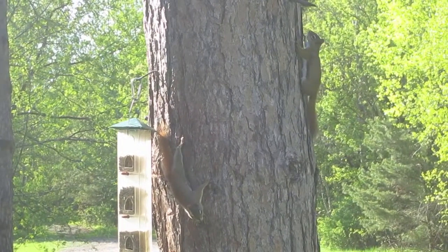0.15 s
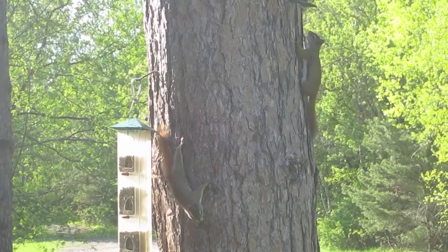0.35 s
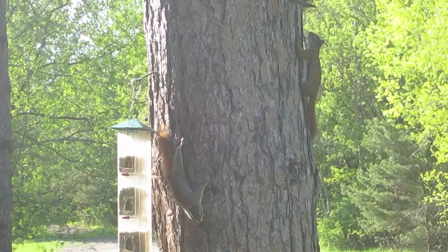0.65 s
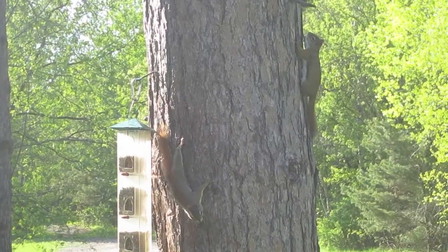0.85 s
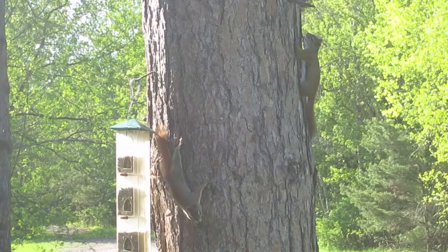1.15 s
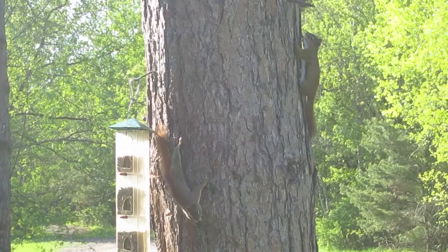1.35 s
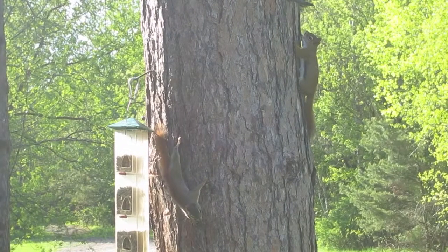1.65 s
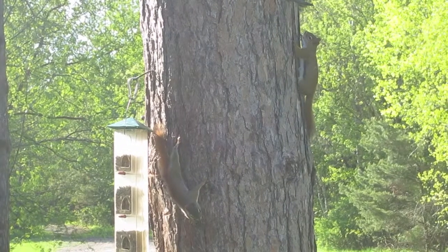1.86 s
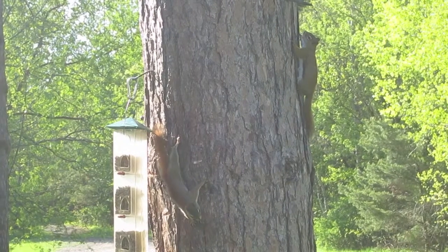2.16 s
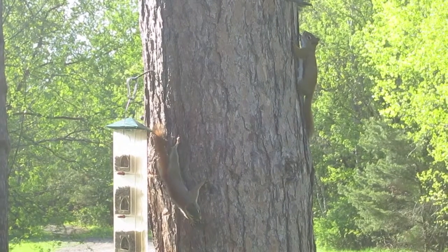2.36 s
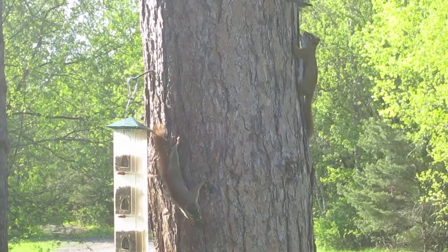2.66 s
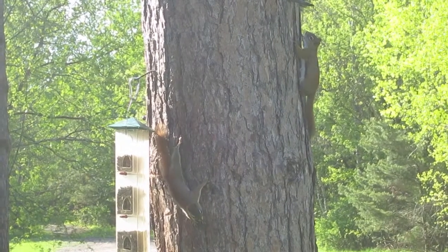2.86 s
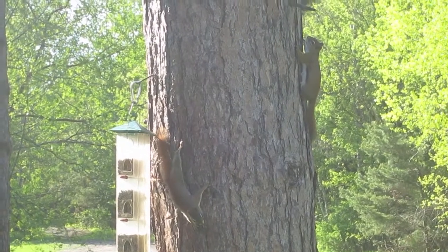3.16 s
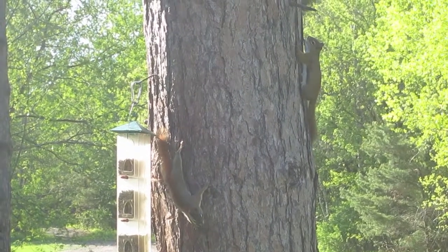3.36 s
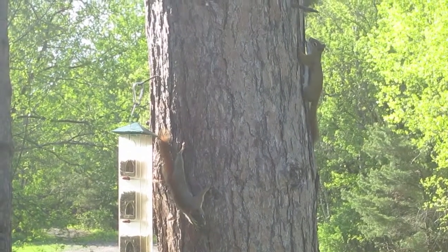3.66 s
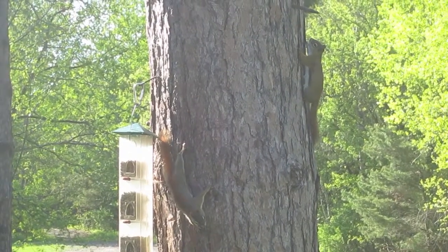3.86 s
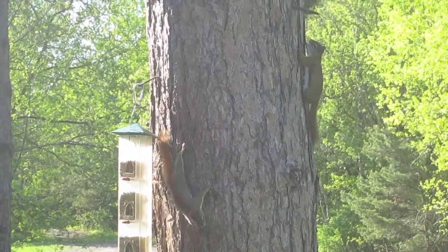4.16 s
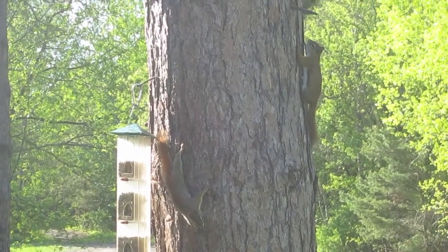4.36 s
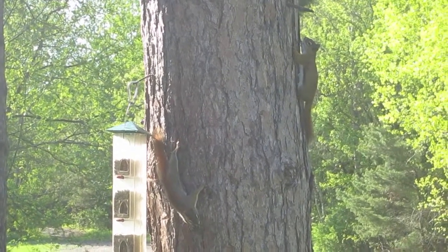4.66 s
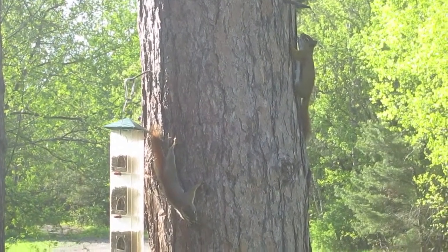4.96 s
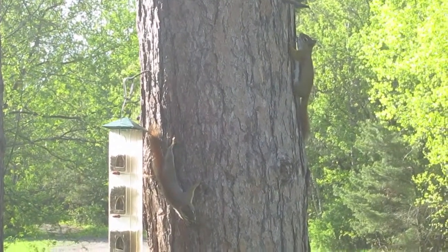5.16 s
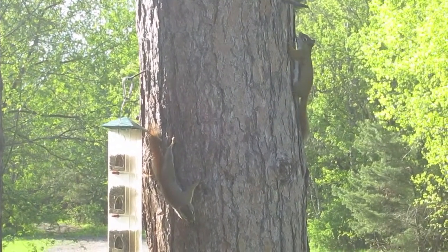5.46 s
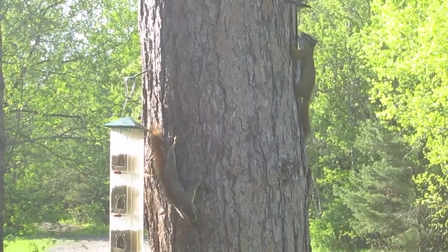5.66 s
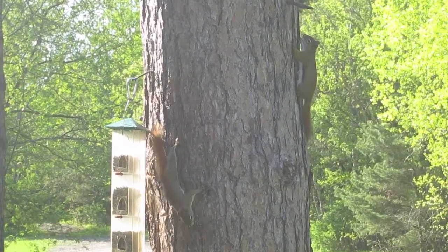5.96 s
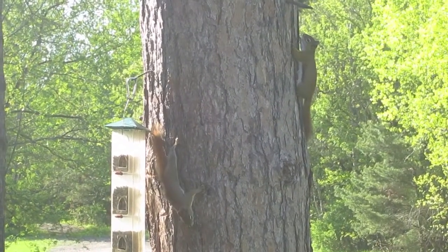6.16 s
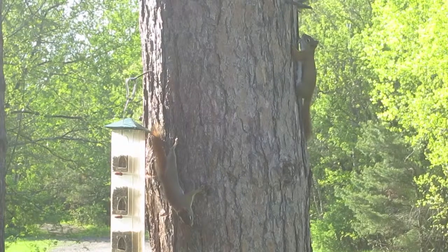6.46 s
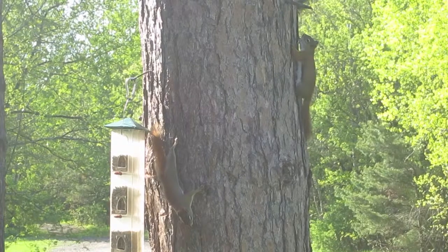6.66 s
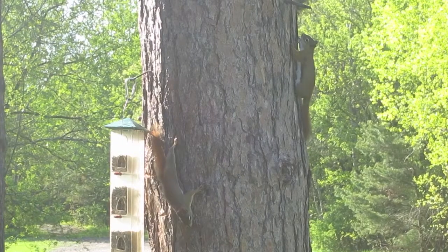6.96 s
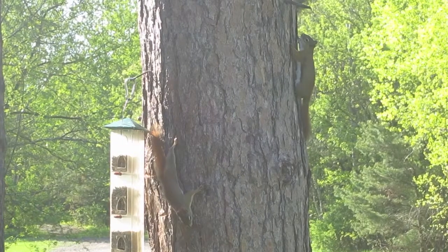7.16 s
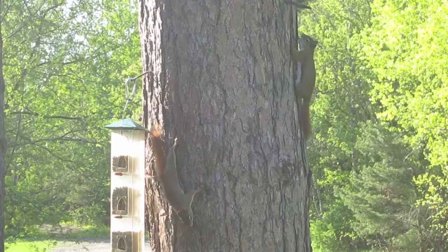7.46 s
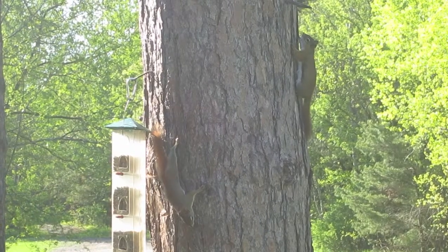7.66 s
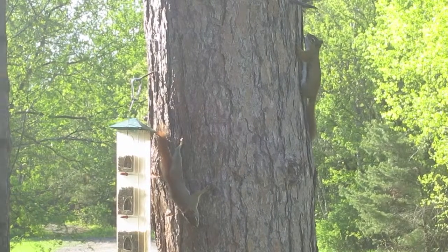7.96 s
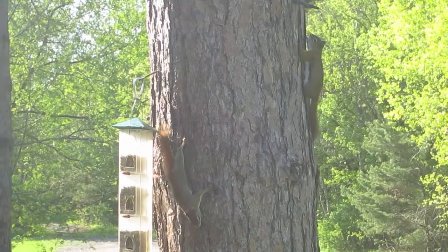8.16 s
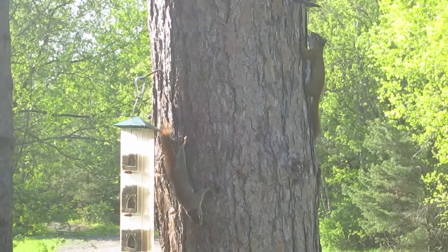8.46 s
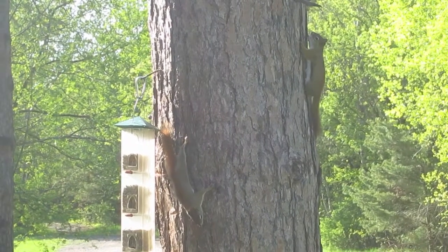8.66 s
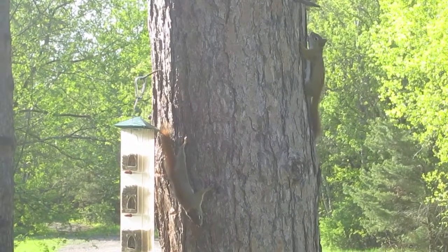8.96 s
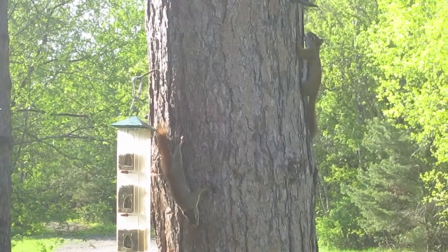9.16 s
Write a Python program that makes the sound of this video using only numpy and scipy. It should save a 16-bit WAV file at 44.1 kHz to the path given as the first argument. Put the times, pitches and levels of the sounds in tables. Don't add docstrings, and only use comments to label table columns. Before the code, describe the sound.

Rapid steady squirrel chatter breaks into squeak-led barks and a rival's replies in a quiet wooded yard, with low wind buffeting near the end.

```python
import sys
import numpy as np
from scipy import signal
from scipy.fft import rfft, irfft
from scipy.io import wavfile

SR = 44100
rng = np.random.default_rng(int(sys.argv[2]) if len(sys.argv) > 2 else 0)


def unload_wav(signal):
    wavfile.write(
        sys.argv[1],
        SR,
        np.round(np.clip(np.atleast_2d(signal).T, -1, 1) * 32767).astype(np.int16),
    )


def invert_db(x):
    u = np.asarray(x, float) / 20
    return 10 ** u


N = 410571


def rms_one(x):
    return x / np.sqrt(np.mean(x ** 2) + 1e-20)


def drift(hz):
    lowpass = signal.butter(2, hz, fs=SR, output="sos")
    settled = signal.sosfilt(lowpass, rng.standard_normal(N + SR))[SR:]
    return rms_one(settled)


def coloured(spectrum):
    hz, level_db = np.transpose(spectrum)
    log_hz = np.log(np.fft.rfftfreq(N, 1 / SR) + 1)
    gain = invert_db(np.interp(log_hz, np.log(hz), level_db))
    return irfft(rfft(rng.standard_normal(N)) * gain, N)


def resonances(x, modes):
    out = 0
    for k, (hz, width_hz, level_db) in enumerate(modes):
        r = np.exp(-np.pi * width_hz / SR)
        ring = signal.lfilter([1, 0, -1], [1, -2 * r * np.cos(2 * np.pi * hz / SR), r * r], x)
        out = out + (-1) ** k * invert_db(level_db) * (1 - r * r) / 2 * ring
    return out


def highpass(x, hz):
    return signal.sosfilt(signal.butter(2, hz, "high", fs=SR, output="sos"), x)


def lowpass(x, order, hz):
    return signal.sosfilt(signal.butter(order, hz, fs=SR, output="sos"), x)


def add(track, start_s, sound):
    i = round(start_s * SR)
    track[i:i + len(sound)] += sound[:N - i]


def swell(t, length, rise, fall):
    return np.sin(np.pi / 2 * np.clip(t / rise, 0, 1)) ** 2 * np.exp(-np.maximum(t - length, 0) / fall)


# (time [s], level [dB], length [ms], top pitch [Hz])
NEAR_CHATTER = [(.047, -22.5, 16, 1630), (.156, -21.5, 21, 1640), (.259, -22, 21, 1634),
                (.363, -21, 22, 1478), (.473, -20, 22, 1544), (.579, -22.5, 23, 1626),
                (.684, -24, 28.3, 1444), (.794, -23.5, 31.3, 1450), (.905, -21, 19.4, 1607),
                (1.011, -21.5, 15.4, 1524), (1.122, -21, 14.5, 1495), (1.229, -20, 15.7, 1418),
                (1.334, -22, 13, 1390), (1.433, -23.5, 17.7, 1362), (1.549, -19.5, 18, 1560),
                (1.678, -24, 13.5, 1342), (1.802, -24, 29, 1500), (1.92, -22, 22.3, 1539),
                (2.038, -20.5, 18.4, 1540), (2.171, -22.5, 22.4, 1595), (2.297, -23.5, 19.7, 1500),
                (2.413, -22.5, 26, 1704), (2.533, -23, 18, 1540), (2.655, -19, 21.6, 1700),
                (2.778, -24.5, 16, 1306)]
# (time [s], level [dB], length [ms], top pitch [Hz])
NEAR_SCOLDING = [(2.9, -18, 16, 1692), (3.129, -19, 16.3, 1708), (3.229, -22, 15.6, 1418),
                 (3.341, -22, 18, 1500), (3.462, -23.5, 18.4, 1440), (3.591, -18.5, 20.3, 1763),
                 (3.713, -25.5, 15, 1310), (3.834, -22.5, 18.4, 1560), (3.942, -22, 25.5, 1580),
                 (4.055, -18.5, 17.5, 1584), (4.176, -25, 16.4, 1280), (6.032, -23, 15.4, 1382),
                 (6.141, -19, 17.7, 1636), (6.239, -21.5, 13, 1168), (6.35, -19, 19.4, 1663),
                 (6.466, -21, 18, 1408), (6.585, -21, 19, 1474), (8.153, -26.5, 7.7, 1170),
                 (8.286, -19, 26, 1743), (8.433, -24, 22.6, 1386), (8.553, -20.5, 19.8, 1670),
                 (8.688, -20.5, 16, 1416), (8.809, -21.5, 19, 1443)]
# (time [s], squeak length [ms], first pitch [Hz], bark level [dB], bark length [ms])
ALARM_CALLS = [(4.308, 25.6, 3560, -18.5, 27), (4.657, 29.4, 3520, -18.5, 31),
               (5.069, 27.7, 3880, -19, 27.4), (5.339, 29.5, 3140, -20, 34), (5.635, 32.5, 3170, -21, 25.3),
               (6.862, 24.2, 3540, -19, 29.6), (7.177, 30.4, 3440, -19, 26.2),
               (7.668, 28, 3480, -19.5, 25.3), (7.972, 30, 3320, -19, 25.6), (8.935, 26.7, 3510, -16, 24.4),
               (9.192, 31, 3430, -19, 25.3)]
# (time [s], level [dB], length [ms], top pitch [Hz])
RIVAL_BARKS = [(.012, -28, 22, 1910), (.128, -25, 22, 1930), (1.173, -34.5, 15.7, 1333),
               (1.29, -28.5, 20, 2470), (1.511, -43, 21, 1500), (1.619, -26, 25, 1745),
               (1.722, -25, 25.4, 1980), (2.514, -25, 40, 2045), (2.625, -25, 22, 1860),
               (2.751, -38.5, 18, 1450), (3.413, -20, 28, 1702), (3.827, -28, 18, 1955),
               (4.462, -25.5, 22.4, 2014), (4.586, -31.5, 25, 1675), (4.847, -43, 22, 1210),
               (5.937, -23, 30, 1697), (6.561, -40, 21, 1550), (6.669, -37, 13, 1237),
               (6.722, -35.5, 10, 1170), (6.777, -28.5, 10, 1917), (7.526, -19.5, 29.3, 1710),
               (7.96, -42, 20, 1230), (8.211, -38, 16, 1160), (8.356, -43, 19, 1980),
               (8.652, -40, 33, 1190), (8.758, -21.5, 18, 1960), (8.869, -32, 8.5, 1300),
               (9.081, -35, 17.5, 1220)]
# (time [s], level [dB], length [ms], top pitch [Hz])
WOOD_SCRAPS = [
    (3.008, -38.5, 20, 1630),
    (5.1, -41, 32, 1140),
]


def all_barks():
    gap_ms, top_hz = 6.5, 1704
    alarms = [(s + (squeak_ms + gap_ms) / 1000, level_db, bark_ms, top_hz)
              for s, squeak_ms, _, level_db, bark_ms in ALARM_CALLS]
    kinds = {"chatter": NEAR_CHATTER, "scolding": NEAR_SCOLDING, "alarm": alarms,
             "rival": RIVAL_BARKS, "scrap": WOOD_SCRAPS}
    return [(kind, *row) for kind, rows in kinds.items() for row in rows]


def bark_pitch(t, kind, length_ms, top_hz, hz_per_ms):
    rival = kind in ("rival", "scrap")
    first_hz = 1080 if top_hz > 1660 else 740
    climb = (top_hz - first_hz) / hz_per_ms / 1000
    if rival and top_hz < 1800:
        climb *= 2
    rising = top_hz - (top_hz - first_hz) * np.clip(1 - t / climb, 0, 1) ** 1.4
    past = np.maximum(t - climb, 0)
    if rival:
        sag = .2 * (past / (length_ms / 1000 - .5 * climb)) ** 3.9
    else:
        sag = (.03 if kind == "alarm" else .085) * (past / .01) ** 2
    return rising * np.maximum(1 - sag, .6)


def bark_envelope(t, length_ms, rival, hoarse):
    slow = .008 if rival else .012 if hoarse else .006
    step = .2 if rival else .25 if hoarse else .42
    onset = np.clip(t / 0.00042, 0, 1) * (step + (1 - step) * swell(t, 1, slow, 1))
    return onset * swell(t, 0.94 * length_ms / 1000, 0.00025, .005 if rival else 0.0074)


BARK_MANNER = {"chatter": (-3, 0.45, 53), "scolding": (-4, 7.1, 55), "alarm": (-5.5, .1, 50),
               "rival": (-2, -.5, 110), "scrap": (-15, 3, 64)}
# (centre [Hz], width [Hz], level [dB])
THROAT_MODES = [(547, 67, -10.5), (928, 70, -4.5), (1500, 620, -12), (2811, 472, -3.5), (3416, 403, 2.5)]
# (centre [Hz], width [Hz], level [dB])
MOUTH_MODES = [(5300, 1540, -13), (7135, 734, -3), (9350, 4140, -13)]
# (centre [Hz], width [Hz], level [dB])
LIP_MODES = [(4147, 595, -4.5)]
# (centre [Hz], width [Hz], level [dB])
TEETH_MODES = [(11940, 650, -8.5), (12370, 2500, -16)]


def barks():
    wobble, flutter, air = drift(229), drift(196), rng.standard_normal(N)
    low, high, lips, teeth = np.zeros((4, N))
    t = np.arange(SR // 14) / SR
    for kind, s, level_db, length_ms, top_hz in all_barks():
        middle_db, db_per_khz, hz_per_ms = BARK_MANNER[kind]
        bright_db = middle_db + db_per_khz * (top_hz - 1500) / 1000
        i = min(round(s * SR), N - len(t))
        now = slice(i, i + len(t))
        rival = kind in ("rival", "scrap")
        hoarse = level_db < -32.5 or kind == "alarm"
        if hoarse:
            rough = 1.15
        elif rival:
            rough = .55 if level_db > -23 else .8
        else:
            rough = .9

        pitch = bark_pitch(t, kind, length_ms, top_hz, hz_per_ms) * (1 + .04 * rough * wobble[now])
        phase = 2 * np.pi * np.cumsum(pitch) / SR
        pulses = sum(np.cos(k * phase) * (k * pitch < 14500) for k in range(1, 20))
        pulses -= 0.56 * rival * np.cos(phase)
        puffs = rough * air[now] * (1.2 + np.cos(phase))
        effort = invert_db(level_db + 2.17 * rough * flutter[now]) * bark_envelope(t, length_ms, rival, hoarse)

        start = max(s - .001 - .003 * rival, 0)
        add(low, start, effort * (pulses + 1.1 * puffs))
        add(lips, start, effort * (pulses + 1.98 * puffs) * invert_db(-6 if hoarse or rival else 0))
        bright = effort * invert_db(bright_db) * (pulses + 2.0 * puffs)
        bright *= np.exp(-t / 0.067) * swell(t, length_ms / 1000, 0.00025, 0.019)
        add(high, start, bright)
        add(teeth, start, bright * invert_db(-12 if rival else 3 if hoarse else 0))
    voice = invert_db(0.5) * resonances(low, THROAT_MODES) + invert_db(2) * resonances(high, MOUTH_MODES)
    voice -= resonances(lips, LIP_MODES) + invert_db(7) * resonances(teeth, TEETH_MODES)
    return lowpass(highpass(voice, 420), 10, 13700)


def hold_ms_of(first_hz):
    break_hz, hold_ms_per_khz, least_hold_ms = 3560, 15, 1.58
    return least_hold_ms + hold_ms_per_khz * max(break_hz - first_hz, 0) / 1000


# (time [s], length [ms], first pitch [Hz], top pitch [Hz], level [dB])
SOLO_SQUEAKS = [
    (3.377, 18, 4980, 5080, -30),
    (7.443, 36, 3240, 5300, -27.5),
]


def all_squeaks():
    highest_hz, loss_hz_per_ms, under_bark_db = 5622, 39, 5.5
    leading = [(s, squeak_ms, first_hz, highest_hz - loss_hz_per_ms * hold_ms_of(first_hz),
                level_db - under_bark_db)
               for s, squeak_ms, first_hz, level_db, _ in ALARM_CALLS]
    return SOLO_SQUEAKS + leading


def squeaks():
    out, quiver = np.zeros(N), drift(180)
    for s, length_ms, first_hz, top_hz, level_db in all_squeaks():
        t = np.arange(int(length_ms * SR / 1000)) / SR
        hold, end, i = hold_ms_of(first_hz) / 1000, length_ms / 1000, round(s * SR)
        climb_time = .0030 - 0.35 * min(hold, .007)
        climb = 1 - np.exp(-np.maximum(t - hold, 0) / climb_time)
        droop = (1 - first_hz / top_hz) * np.exp((t - end) / .0029)
        pitch = first_hz * (1 + 8 * np.minimum(t, hold)) * (1 - climb) + top_hz * (climb - droop)
        phase = 2 * np.pi * np.cumsum(pitch) / SR
        held = 1 + 2.9 * (1 - climb) ** 2 * np.clip(hold / 0.0073, 0, 1)
        octave = invert_db(-3.5) * (pitch / top_hz) ** 8
        held_overtones = (held - 1) * (1 - climb) ** 3 * invert_db(-12.5)
        overtones = octave * np.sin(2 * phase) + held_overtones * (np.sin(2 * phase) + np.sin(3 * phase))
        shape = swell(t, end, hold + .003, 1) * swell(end - t, end, .003, 1)
        shape *= invert_db(1.8 * quiver[i:i + len(t)])
        add(out, s, invert_db(level_db - 2.5) * shape * (held * np.sin(phase) + overtones))
    return out


# (time [s], peak [dB])
CLAW_TICKS = [
    (5.874, -37),
    (5.8844, -40),
    (5.895, -34),
    (5.9044, -42),
    (5.9246, -40),
    (7.513, -36),
]
# (centre [Hz], width [Hz], level [dB])
BARK_RING = [(4240, 1500, 0), (7400, 2000, 0), (10500, 3000, -12)]


def claws():
    out, t = np.zeros(N), np.arange(SR // 100) / SR
    for s, peak_db in CLAW_TICKS:
        add(out, s, invert_db(peak_db + 3) * rng.standard_normal(len(t)) * np.exp(-t / .002))
    return resonances(out, BARK_RING)


# (time
# [s], length [ms], first pitch [Hz], last pitch [Hz], level [dB])
BIRD_NOTES = [(.44, 83, 2300, 2196, -28.5), (.51, 100, 2300, 2030, -39), (2.449, 43, 2430, 2340, -32.5),
              (2.566, 130, 2410, 2270, -36.5), (2.94, 74, 2410, 2610, -38.5), (3.007, 49, 2870, 2730, -30),
              (3.062, 28, 2420, 2520, -26.5), (3.528, 40, 2580, 1905, -29), (3.55, 35, 2390, 1814, -32),
              (3.615, 31, 2430, 2030, -37), (3.995, 55, 1940, 2390, -35), (4.065, 44, 2510, 2040, -30),
              (3.915, 35, 2800, 2850, -38), (1.288, 21, 2650, 2380, -28.5), (4.47, 28, 2750, 2400, -29),
              (4.555, 32, 3110, 3290, -35), (4.571, 40, 2200, 2700, -32.5), (8.47, 85, 4950, 4100, -43.5),
              (8.875, 59, 5600, 4970, -40)]


def songbird():
    arch_from_ms, arch_hz_per_ms = 55, 4
    out, warble = np.zeros(N), drift(130)
    for s, length_ms, first_hz, last_hz, level_db in BIRD_NOTES:
        i = round(s * SR)
        u = np.linspace(0, 1, int(length_ms * SR / 1000))
        middle_hz = (first_hz + last_hz) / 2 + arch_hz_per_ms * max(length_ms - arch_from_ms, 0)
        pitch = np.polyval(np.polyfit([0, .5, 1], [first_hz, middle_hz, last_hz], deg=2), u)
        pitch *= 1 + .014 * warble[i:][:len(u)]
        level = invert_db(level_db + 3 + 2.6 * warble[i + SR // 9:][:len(u)])
        whistle = np.sin(2 * np.pi * np.cumsum(pitch) / SR)
        add(out, s, level * np.sin(np.pi * u) ** .5 * whistle)
    return out


def yard(x, near_db, near_t60, far_db, far_t60, apart_db):
    t = np.arange(SR) / SR
    near, far = rng.standard_normal((2, 2, SR))
    near *= invert_db(4 * drift(150)[:SR])
    far = lowpass(far, 1, 6500)
    tail = invert_db(near_db - 60 * t / near_t60) * near * np.clip(t / 0.0012, 0, 1)
    tail += invert_db(far_db - 60 * t / far_t60) * far * np.clip(t / 0.024, 0, 1)
    paths = tail[0] + invert_db(apart_db) * tail[1] * [[1], [-1]]
    paths[:, 0] = 1
    return signal.fftconvolve(x[None], paths, axes=1)[:, :N]


# (time [s], level [dB])
GUST_LEVEL = [
    (6.2, -60),
    (7.2, -57),
    (7.9, -49),
    (8.3, -25.5),
    (8.53, -30),
    (8.74, -41),
    (8.86, -55),
    (9.13, -42),
    (9.28, -66),
]
# (time [s], peak [dB], pitch [Hz])
EDDY_SLAPS = [(6.699, -25, 70), (7.19, -31, 60), (7.329, -15.5, 83.6), (7.39, -23, 90), (7.764, -28, 80),
              (7.89, -27, 90), (7.934, -19, 85), (7.997, -18, 93), (8.119, -16, 117), (8.20, -18, 100),
              (8.245, -9.5, 141), (8.334, -10.5, 94), (8.45, -13, 110), (8.478, -11, 90), (8.508, -8, 100),
              (8.528, -10, 93), (8.687, -20, 129), (9.02, -28, 55.3), (9.085, -31, 60.4), (9.14, -37, 50)]


def wind():
    wake_under_db, wake_db_per_s = 20.5, 150
    t = np.arange(N) / SR
    s, level_db = np.transpose(GUST_LEVEL)
    strength = np.interp(t, s, level_db, left=-90)
    for at, peak_db, _ in EDDY_SLAPS:
        since = t - at
        wake = peak_db - wake_under_db - wake_db_per_s * since
        strength = np.where(since > 0, np.maximum(strength, wake), strength)
    eddies = rng.standard_normal((2, N)) * invert_db(2.5 * drift(25))
    eddies = signal.sosfilt(signal.butter(3, [45, 170], "band", fs=SR, output="sos"), eddies)
    shared, own = np.tanh(0.45 * rms_one(eddies)) * invert_db(0.99 * (strength + 40.5) - 28.5)
    for at, peak_db, hz in EDDY_SLAPS:
        cycles = np.linspace(-1.2, 1.2, int(2.4 * SR / hz))
        bend = (np.pi * cycles) ** 2
        add(shared, at - .5 / hz, invert_db(peak_db) * (2 * bend - 1) * np.exp(-bend))
    return np.array([-invert_db(-6.5) * shared + 0.41 * own, shared])


# (frequency [Hz], density [dB per Hz])
HUM_COMMON = [(20, -26), (40, -17), (97, -0.5), (149, 0.5), (373, -12.5), (600, -6), (960, -10),
              (2160, -19), (5000, -25.5), (12000, -43), (13500, -37), (14500, -62)]
# (frequency [Hz], density [dB per Hz])
HUM_APART = [(20, -26), (40, -10), (89, -8), (153, -5), (400, -10.5), (1160, -17), (2350, -26),
             (6000, -28.5), (12000, -32), (14000, -52), (17000, -66)]


def hum():
    mid, side = coloured(HUM_COMMON), coloured(HUM_APART)
    sway = invert_db(-42.5 + .5 * drift(1.0))
    return sway * (mid + side * [[1], [-1]]) / np.std(mid)


def scene():
    apart_db = -13
    squirrels = yard(barks() + squeaks(), -36.5, 0.09, -49, 0.5, apart_db)
    bird = yard(songbird(), -27, .13, -42, .6, apart_db)
    return invert_db(2) * squirrels + claws() + invert_db(-9) * bird + wind() + hum()


def band_limit(x):
    return signal.sosfilt(signal.butter(12, 16960, fs=SR, output="sos"), x)


def record(dry):
    dry = 1.1 * np.tanh(dry / 1.1)
    edge = resonances(dry.mean(axis=0), [(12900, 1500, -3.0)])
    left = dry[0] + np.roll(edge, shift=1) + .5 * np.roll(edge, shift=40)
    right = dry[1] - .8 * edge + resonances(dry[1], [(7500, 2500, -12)])
    top_cut = signal.cheby2(12, 60, 16900, fs=SR, output="sos")
    mix = signal.sosfilt(top_cut, [left, right])
    return band_limit(mix)


dry = scene()
out = record(dry)
unload_wav(out)
```